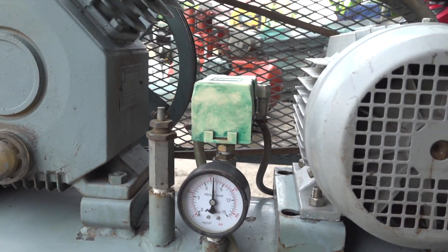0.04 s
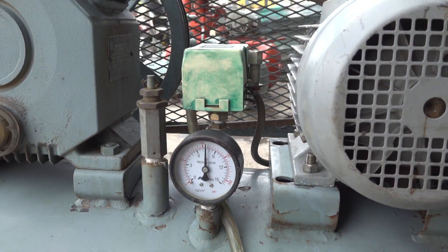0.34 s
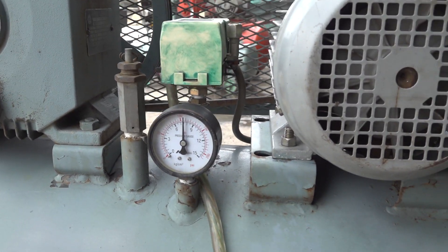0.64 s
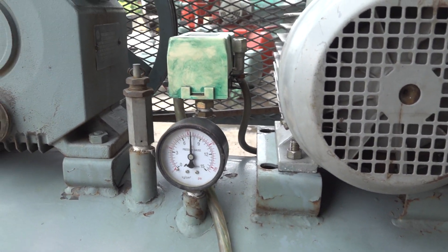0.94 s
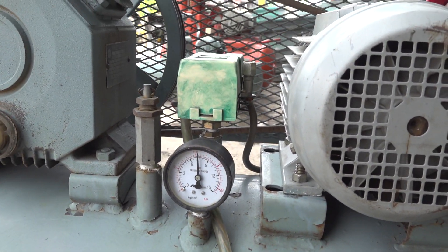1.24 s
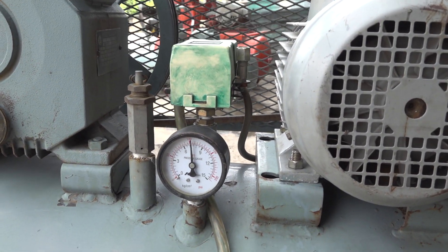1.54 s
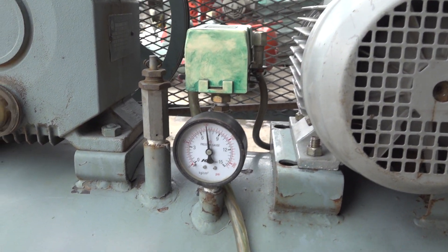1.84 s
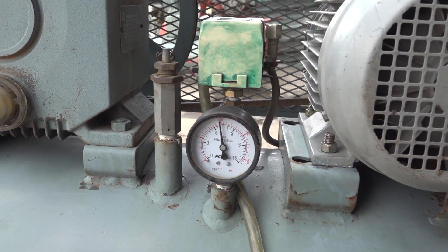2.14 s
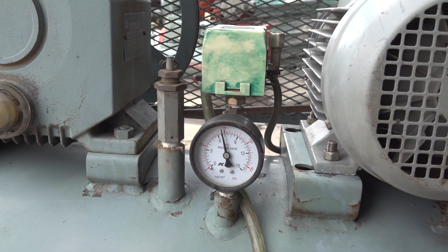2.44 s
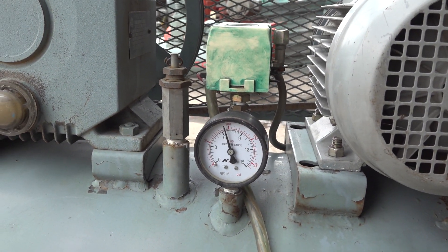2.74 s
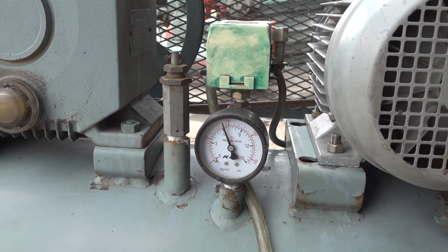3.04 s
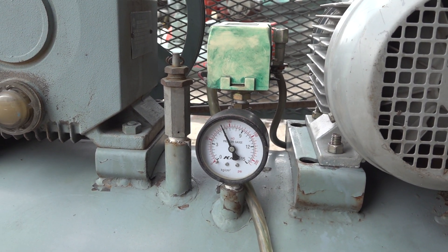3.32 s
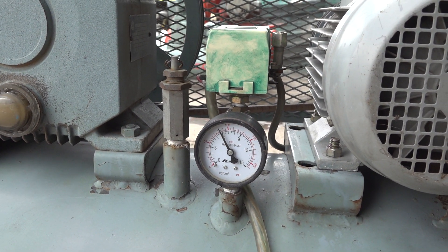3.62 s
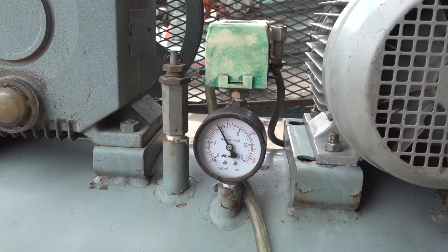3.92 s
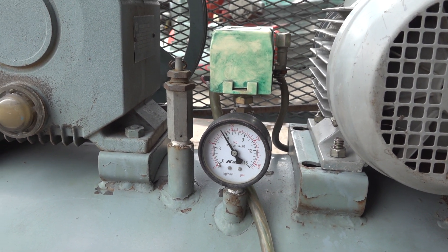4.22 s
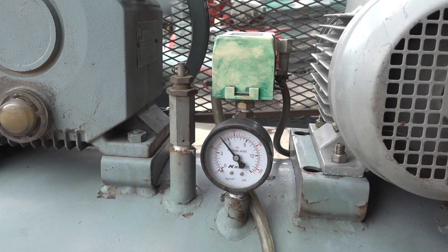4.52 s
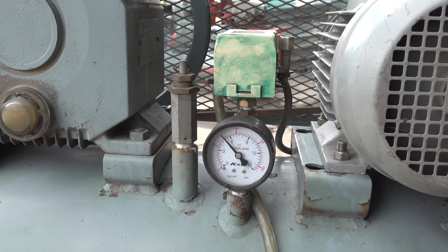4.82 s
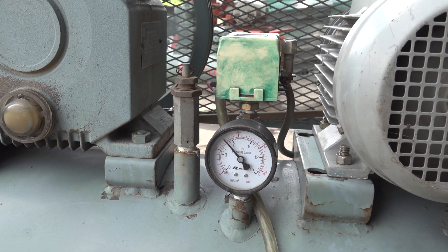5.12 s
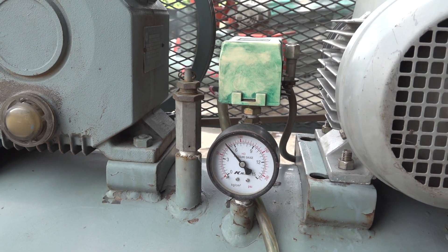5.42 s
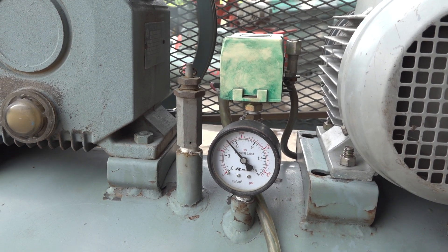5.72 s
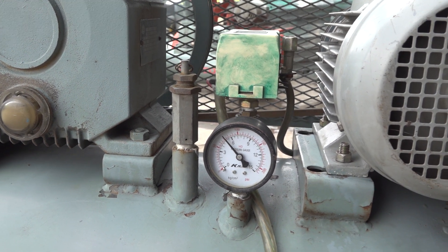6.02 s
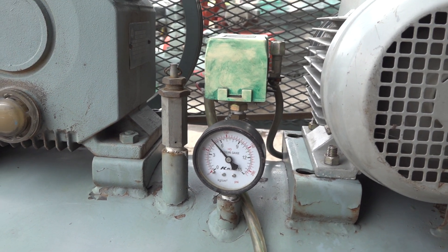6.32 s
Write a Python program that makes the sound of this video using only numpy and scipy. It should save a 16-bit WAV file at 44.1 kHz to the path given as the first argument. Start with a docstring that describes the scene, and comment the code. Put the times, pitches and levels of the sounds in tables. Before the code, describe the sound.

Close to an air compressor in a workshop, a drain valve gurgles with water for the first third of a second. At about 0.4 seconds it clears into a loud, turbulent hiss of escaping air that holds for over five seconds. Between 2 and 3.3 seconds the jet spits with small, dull pops of water. Shrill overtones slide downward around 1.5 and 2.5 seconds, and a brief, very high screech comes at 3.2. A faint half whistle joins from about 3.7 seconds and grows stronger near 5.6. Beneath the hiss, the pump starts at about 4.5 seconds with a faint rising groan and builds. At about 5.9 seconds the valve shuts and the hiss dies quickly. The quieter pump is left until about 6.5 seconds, with rapid, low paired thuds and a wheeze on each turn, over the motor's whirr and thin whine.

```python
"""A workshop, close to an air compressor. Its drain valve gurgles with condensed water, then clears into
a loud turbulent hiss that bleeds the tank. The jet spits now and then, its shrill bands slide down as
the pressure falls, and it half whistles as the valve shuts. As the hiss dies the two-cylinder pump
comes through: a pair of intake thuds and a wheeze on every turn, over the motor's whirr and whine."""
import sys
import numpy as np
from scipy import signal
from scipy.fft import rfft, irfft, next_fast_len
from scipy.io import wavfile
from scipy.ndimage import map_coordinates

SR = 44100
rng = np.random.default_rng(int(sys.argv[2]) if len(sys.argv) > 2 else 0)


def wav_record(signal):
    """Record a signal, one row per channel, as 16-bit PCM in the file named by sys.argv[1]."""
    frames = np.transpose(np.atleast_2d(signal))
    bounded = np.clip(frames, -1, 1)
    # unit amplitude maps onto the largest positive 16-bit level
    quanta = np.round(bounded * 32767).astype(np.int16)
    wavfile.write(sys.argv[1], SR, quanta)


N = 289296
TIME_S = np.arange(N) / SR

OPEN_S, OPENING_S, SHUT_S, SHUT_DB_PER_S = 0.3534, 0.02, 5.925, 178
SHRILL_SAG_HZ_PER_S, SHRILL_EDGE_DB_PER_S = 330, 70
RIPPLE_DEPTH_DB, RIPPLE_HALVED_S = 4.2, 2.1
GUSH_RISE_DB_PER_S, GUSH_FALL_DB_PER_S, SPUTTER_GAIN_DB = 600, 81, -0.5
RUN_START_S, TURN_S, SPIN_UP_S, SPIN_UP_DECAY = 4.5686, 0.07923, 0.041, 0.32
LOAD_DB_PER_S, FULL_LOAD_S, GULP_SCATTER_DB = 7, 5.99, 0.7
LEAK_HZ, LEAK_DB = 6080, -57
TOP_HZ = 15750

# Jet bands: time_s, roar_db, hiss_db, fizz_db
JET_LEVELS = [(0.38, -32, -20, -23), (0.75, -30, -19.5, -22), (0.92, -28.5, -20, -23.5),
              (0.95, -33, -21.5, -22), (1.46, -31, -21, -21.5), (1.58, -32.5, -22.5, -22),
              (2.32, -34.5, -23.5, -21), (2.46, -32, -21.5, -20.5), (2.6, -33, -23.5, -22),
              (3.7, -35, -23, -22), (3.93, -36.5, -25, -23), (5.16, -32, -23, -21.5), (5.44, -28, -22, -23),
              (5.52, -28.5, -21, -22.5), (5.61, -28, -23, -26.5), (5.66, -31, -26.5, -29),
              (5.87, -30, -24, -29), (5.92, -34, -24.5, -30.5)]
# Noise spectra: freq_hz, relative_db
ROAR_SPECTRUM = [(290, -20.5), (500, -17.5), (557, -15), (841, -14.5), (984, -6.5), (2020, -3),
                 (2210, -3.5), (2720, 0.5), (3210, -1.5), (3600, -2.5), (4680, -19), (7920, -120)]
HISS_SPECTRUM = [(1940, -36), (3300, -11), (4200, -3), (4720, -1.5), (5180, -0.5), (7500, -6.5),
                 (9750, -41), (16500, -120)]
FIZZ_SPECTRUM = [(4120, -21.5), (7000, -6), (7850, -5.5), (9460, 1.5), (9910, -1.5), (10700, -9.5),
                 (12400, -5), (14100, -2.5), (15100, -3), (15700, -9)]
GURGLE_SPECTRUM = [(20, -27), (45, -1.5), (62, 1), (85, 0), (140, -2.5), (240, -3), (400, -7.5),
                   (620, -12.5), (1000, -8.5), (1400, -16.5), (2600, -20), (5600, -29.5), (7000, -37),
                   (16000, -57)]
WHEEZE_SPECTRUM = [(800, -0.5), (2000, -10), (3000, -1.5), (4500, -3), (6200, -5), (7300, -10.5),
                   (9500, -8.5), (11500, -23), (14000, -14), (16000, -13)]
WHIRR_SPECTRUM = [(18, -35), (30, -13), (245, -5.5), (404, -4.5), (988, -13.5), (1250, -11.5), (1430, -14),
                  (1760, -20.5), (3870, -21), (5310, -27), (6050, -27), (7470, -32), (10500, -33),
                  (11400, -46), (16000, -39)]
SPIT_SPECTRUM = [(30, 4), (100, -10), (400, 0), (1000, -12), (3000, -19), (8000, -45)]
# Valve gap ringing on opening, half whistle on shutting, screech into sizzle: time_s, pitch_hz, level_db
GAP_RING = [(.36, 2420, -29), (.5, 2548, -28.5), (.7, 2475, -34.5), (.88, 2245, -29.5), (.93, 2040, -28),
            (.955, 1973, -42), (1.4, 1855, -37), (1.7, 1785, -62)]
VALVE_WHISTLE = [(3.4, 2850, -70), (3.7, 2860, -45.5), (5.3, 2777, -39), (5.55, 2850, -39),
                 (5.6, 2850, -31), (5.68, 2760, -39), (5.9, 2750, -37), (6.05, 2650, -33)]
VALVE_SCREECH = [(3.15, 13800, -80), (3.21, 13850, -23), (3.28, 13600, -21), (3.34, 13600, -50),
                 (3.5, 12500, -35), (4.5, 12350, -35), (5, 12250, -37), (5.4, 12200, -80)]
# Shrill bands of the fast jet: start_s, length_s, start_pitch_hz, level_db
SHRILL_BANDS = [(1.55, .5, 13260, -32), (2.522, .62, 14350, -24.5)]
# Valve pinch, 0 open to 1 slit: time_s, fraction
VALVE_PINCH = [(.36, 1), (.9, 0.61), (1.05, 0.12), (2, 0.17), (5, 0.035), (5.3, 0.4), (5.55, 0.3),
               (5.65, 0.87), (6.05, 0.85)]
# Jet slowing, 0 fast to 1 slow: time_s, fraction
JET_SLOWING = [(1, 0), (3.2, .3), (3.8, 1)]
# Peaks and dips of the slit, and of the outlet at fast and slow flow: centre_hz, width_hz, gain_db
SLIT_COLOUR = [(1350, 770, -2.5), (3300, 280, -2), (6010, 500, 7.5), (7200, 570, -15.5), (8460, 560, 4),
               (11000, 530, -3.5)]
FAST_OUTLET_COLOUR = [(2740, 460, 1), (3300, 300, -0.5), (3730, 280, 2), (4400, 310, 3), (4940, 370, -2.5),
                      (5450, 350, 1.5), (8500, 300, 2.5)]
SLOW_OUTLET_COLOUR = [(2060, 120, 0), (2860, 260, 1), (3420, 670, -2), (4130, 300, 3.5), (4570, 450, -3),
                      (5100, 610, 2), (8750, 300, 3), (9570, 470, 2.5), (11360, 400, 3), (11850, 300, -5),
                      (12900, 460, 1.5), (12800, 248, 0), (15300, 600, 5)]
# Treble comb: time_s, spacing_hz
RIPPLE_SPACING = [(.36, 1540), (.55, 1610), (.68, 1495), (1.17, 1395), (1.28, 1445), (1.46, 1420),
                  (1.66, 1315), (2.3, 1240)]
# Stereo balance: freq_hz, left_minus_right_db
JET_BALANCE = [(60, -1), (110, 1), (200, 1), (380, -0.5), (700, -1.5), (1290, -3.5), (2380, -3.5),
               (4400, -2), (8120, -6), (15000, -1)]
WATER_BALANCE = [(60, 1), (110, -1.5), (200, 0.5), (380, 0), (700, 3), (1290, 4), (2380, 1.0), (4400, 0),
                 (8120, -0.5), (15000, -0.5)]
# Stereo phase: freq_hz, left_lead_rad
JET_PHASE = [(300, 0.5), (780, 1.7), (1300, 0.9), (2700, 0.68), (4900, 0.25), (6000, 1.1), (7400, -1.5),
             (8600, -1.1), (9700, -0.9), (11300, -5), (12800, -5), (15400, -6)]
WATER_PHASE = [(40, 0.19), (200, 0.83), (500, 1.76), (1000, 1.05), (2600, 0.76), (6000, 0.85)]
# Gushes of wet air: start_s, length_s, relative_db
WET_GUSHES = [(0, 0.34, -22), (0.548, 0.33, -38.5), (1.28, 0.18, -52.5), (1.948, .35, -47.5),
              (2.39, 0.4, -40.5), (2.85, 0.27, -44.5), (3.21, 0.054, -41.5), (3.597, 0.17, -53.5)]
# Drops in the jet: start_s, level_db
SPIT_DROPS = [(2.087, -29), (2.485, -33), (2.577, -31), (2.758, -24), (2.765, -25), (2.93, -32),
              (3.214, -31), (3.253, -29)]
# Cylinders in a V: delay_in_turn_s, active_from_s, full_load_db
PUMP_CYLINDERS = [(0, 4.78, -19.5), (0.0207, 4.5, -20)]
# Intake pipe resonances: centre_hz, width_hz, relative_db
PIPE_MODES = [(96, 80, -5), (255, 108, 5), (526, 78, -1)]
# Wheeze on each turn: time_s, level_db
TURN_WHEEZE = [(4.8, -60), (5.6, -49), (6, -47), (6.39, -43), (6.55, -35)]
# Pump start-up groan: time_s, pitch_hz, level_db
START_GROAN = [(4.53, 360, -80), (4.56, 390, -45), (4.6, 452, -50), (4.635, 630, -46), (4.68, 670, -46),
               (4.72, 680, -80)]
# Fan and belt: time_s, level_db
WHIRR_LEVEL = [(0, -34), (.5, -53), (4.4, -54), (5.3, -49.5), (6, -39.5), (6.56, -39)]
# Motor whine: pitch_hz, max_level_db
WHINE_TONES = [(1214, -50.5), (1312, -53), (1736, -65), (2542, -55)]


def jet():
    """Turbulent air leaves the open valve; all bands flutter together."""
    opening = np.clip((TIME_S - OPEN_S) / OPENING_S, 0, 1)
    shutting = amp(-SHUT_DB_PER_S * np.maximum(TIME_S - SHUT_S, 0))
    roar_db, hiss_db, fizz_db = curves(JET_LEVELS)
    roar = amp(roar_db) * valve_colour(valve_noise(ROAR_SPECTRUM, coherence=0.8))
    hiss = amp(hiss_db) * valve_colour(valve_noise(HISS_SPECTRUM, coherence=0.94))
    fizz = amp(fizz_db) * valve_colour(valve_noise(FIZZ_SPECTRUM, coherence=0.81))
    ring = narrow_band(*curves(GAP_RING), width_hz=750)
    whistle = narrow_band(*curves(VALVE_WHISTLE), width_hz=260)
    shrill = shrill_bands()
    screech = narrow_band(*curves(VALVE_SCREECH), width_hz=500)
    flutter = amp(0.42 * wobble(30) + 0.41 * wobble(80) + 0.38 * wobble(400))
    return opening * shutting * flutter * (roar + hiss + fizz + ring + whistle + shrill + screech)


def valve_colour(noise):
    """Slit, outlet and treble comb colour the jet at constant power."""
    hz, frame_s, frames = signal.stft(noise, SR, nperseg=512)
    hz = hz[:, None]
    slit_db = at_time(VALVE_PINCH, frame_s) * bumps_db(SLIT_COLOUR, hz)
    slow = at_time(JET_SLOWING, frame_s)
    outlet_db = slow * bumps_db(SLOW_OUTLET_COLOUR, hz) + (1 - slow) * bumps_db(FAST_OUTLET_COLOUR, hz)
    gain = amp(treble_ripple_db(frame_s, hz) + slit_db + outlet_db)
    power = (abs(frames.mean(0)) ** 2).mean(1, keepdims=True)
    gain /= np.sqrt((power * gain ** 2).sum(0) / power.sum())
    return signal.istft(frames * gain, nperseg=512)[1][:, :N]


def treble_ripple_db(time_s, hz):
    """A treble comb that swirls up and down, drifts lower and fades."""
    fade = 1 / (1 + (time_s / RIPPLE_HALVED_S) ** 8)
    treble = at_freq([(9000, 0), (11500, 1)], hz)
    return RIPPLE_DEPTH_DB * fade * treble * np.cos(2 * np.pi * hz / at_time(RIPPLE_SPACING, time_s))


def shrill_bands():
    """Each band swells, sinks in pitch with the pressure and fades."""
    bands = np.zeros((2, N))
    for start_s, length_s, start_hz, level_db in SHRILL_BANDS:
        pitch_hz = start_hz - SHRILL_SAG_HZ_PER_S * (TIME_S - start_s)
        envelope_db = swell_db(start_s, length_s, SHRILL_EDGE_DB_PER_S, SHRILL_EDGE_DB_PER_S)
        bands += narrow_band(pitch_hz, level_db + envelope_db, width_hz=1400, left_db=-5)
    return bands


def sputter():
    """Condensed water gurgles in lumps; each gush starts abruptly, holds and drains."""
    gushes_db = [db + swell_db(start_s, length_s, GUSH_RISE_DB_PER_S, GUSH_FALL_DB_PER_S)
                 for start_s, length_s, db in WET_GUSHES]
    lumps = amp(0.9 * wobble(90))
    gurgle = lumps * valve_noise(GURGLE_SPECTRUM, 1.0, WATER_BALANCE, WATER_PHASE)
    return amp(SPUTTER_GAIN_DB + np.max(gushes_db, axis=0)) * unit_rms(gurgle)


def spits(decay_s=0.0031):
    """Water drops pop dully in the stream."""
    bursts = sum(amp(db) * (TIME_S >= start_s) * np.exp(-abs(TIME_S - start_s) / decay_s)
                 for start_s, db in SPIT_DROPS)
    return bursts * valve_noise(SPIT_SPECTRUM, 0.79, WATER_BALANCE, WATER_PHASE)


def pump():
    """Each cylinder gulps once a turn, harder as load builds; air wheezes around the strokes."""
    turns = np.arange(np.ceil((N / SR - RUN_START_S) / TURN_S))
    starts_s = RUN_START_S + turns * TURN_S - SPIN_UP_S * SPIN_UP_DECAY ** turns  # first turns are longer
    gulps, wheeze = np.zeros(N), np.zeros(N)
    for start_s in starts_s:
        load_db = LOAD_DB_PER_S * min(start_s - FULL_LOAD_S, 0)
        for delay_s, active_from_s, full_load_db in PUMP_CYLINDERS:
            gulp_s = start_s + delay_s
            gulp_db = full_load_db + load_db + GULP_SCATTER_DB * rng.standard_normal()
            if gulp_s > active_from_s:
                gulps += np.bincount([round(gulp_s * SR)], [amp(gulp_db)], minlength=N)[:N]
                wheeze += amp(gulp_db - 24.5) * (abs(TIME_S - gulp_s - 0.002) < 0.005)  # 10 ms puff
        swell = (1 + ((TIME_S - start_s + 0.0076) / 0.012) ** 2) ** -1.36
        wheeze += amp(at_time(TURN_WHEEZE, start_s)) * swell
    return intake_thuds(gulps) + wheeze * stereo_noise(WHEEZE_SPECTRUM, coherence=0.73)


def intake_thuds(gulps, left_lead_s=0.00018):
    """Gulps ring the intake pipe, on the left."""
    def pipe(hz):
        modes = sum(amp(db) * 1j * hz * width_hz / (centre_hz ** 2 - hz ** 2 + 1j * hz * width_hz)
                    for centre_hz, width_hz, db in PIPE_MODES)
        return modes / (1 + (hz / 730) ** 8)  # the intake valve opens softly
    peak = abs(filtered(signal.unit_impulse(N, "mid"), pipe)).max()
    advance_s = np.array([[0.5], [-0.5]]) * left_lead_s
    return -filtered(gulps, lambda hz: pipe(hz) * np.exp(2j * np.pi * hz * advance_s)) / peak


def groan():
    """A low rising groan as the pump starts."""
    return narrow_band(*curves(START_GROAN), width_hz=290, left_db=0)


def motor():
    """Fan and belt whirr under a thin whine."""
    level_db = at_time(WHIRR_LEVEL, TIME_S)
    whine = sum(amp(db) * np.sqrt(2) * np.sin(2 * np.pi * hz * TIME_S + 0.6 * wobble(12))
                for hz, db in WHINE_TONES)
    whirr = stereo_noise(WHIRR_SPECTRUM, coherence=0.85)
    return amp(level_db) * whirr + amp(level_db - level_db.max()) * whine


def leak():
    """A thread of air sings through the shut valve."""
    return (TIME_S > SHUT_S) * narrow_band(np.full(N, LEAK_HZ), LEAK_DB, width_hz=380, left_db=-5)


def valve_noise(spectrum, coherence, balance=JET_BALANCE, phase=JET_PHASE):
    """Coloured noise, rms 1, with level and phase offsets between channels."""
    def response(hz):
        left = amp(at_freq(balance, hz) / 2) * np.exp(0.5j * at_freq(phase, hz))
        sides = np.array([left, 1 / left])
        shared = min(coherence, 0.99)
        centre_power = shared * abs(sides.sum(0)) ** 2 + (1 - shared) * (abs(sides) ** 2).sum(0)
        return sides * amp(at_freq(spectrum, hz)) / np.sqrt(centre_power)
    return unit_rms(filtered(white_pair(coherence), response))


def stereo_noise(spectrum, coherence):
    """Centred coloured noise, rms 1."""
    return unit_rms(filtered(white_pair(coherence), lambda hz: amp(at_freq(spectrum, hz))))


def narrow_band(pitch_hz, level_db, width_hz, left_db=-2.5):
    """Narrow noise around a moving pitch; left_db is left minus right."""
    inphase, quadrature = filtered(rng.standard_normal((2, N)),
                                   lambda hz: 1 / (1 + (2 * hz / width_hz) ** 4))
    phase = 2 * np.pi * np.cumsum(pitch_hz) / SR
    band = unit_rms(inphase * np.cos(phase) + quadrature * np.sin(phase))
    return amp(level_db) * band * amp([[left_db / 2], [-left_db / 2]])


def white_pair(coherence):
    """Two white noises sharing part of their power."""
    common = np.sqrt(coherence) * rng.standard_normal(N)
    return common + np.sqrt(1 - coherence) * rng.standard_normal((2, N))


def wobble(rate_hz):
    """Smooth random curve."""
    knots = rng.standard_normal(int(N * rate_hz / SR) + 4)
    return map_coordinates(knots, [TIME_S * rate_hz])


def swell_db(start_s, length_s, rise_db_per_s, fall_db_per_s):
    """Attack, hold at 0 dB, release."""
    age_s = TIME_S - start_s
    return np.minimum(0, np.minimum(age_s * rise_db_per_s, (length_s - age_s) * fall_db_per_s))


def bumps_db(rows, hz):
    """Sum of bell-shaped peaks and dips."""
    return sum(db * 2 ** -(2 * (hz - centre_hz) / width_hz) ** 2 for centre_hz, width_hz, db in rows)


def filtered(x, response):
    """Apply a complex frequency response."""
    size = next_fast_len(N + SR // 2)
    return irfft(rfft(x, size) * response(np.fft.rfftfreq(size, 1 / SR)), size)[..., :N]


def curves(rows):
    """Each column after time_s, per sample."""
    time_s, *columns = np.transpose(rows)
    return [np.interp(TIME_S, time_s, column) for column in columns]


def at_time(points, time_s):
    return np.interp(time_s, *np.transpose(points))


def at_freq(points, hz):
    """Interpolate on a log frequency axis."""
    freq_hz, values = np.transpose(points)
    return np.interp(np.log(hz + 1), np.log(freq_hz + 1), values)


def unit_rms(x):
    """Scale the channel mean to rms 1."""
    return x / np.sqrt(np.mean(np.atleast_2d(x).mean(0) ** 2) + 1e-20)


def amp(db):
    return 10 ** (np.asarray(db) / 20)


def scene():
    """Drain valve plus machine."""
    return jet() + leak() + sputter() + spits() + groan() + pump() + motor()


def record(dry):
    """Brick-wall low-pass."""
    return filtered(dry, lambda hz: hz < TOP_HZ)


dry = scene()
out = record(dry)
wav_record(out)
```